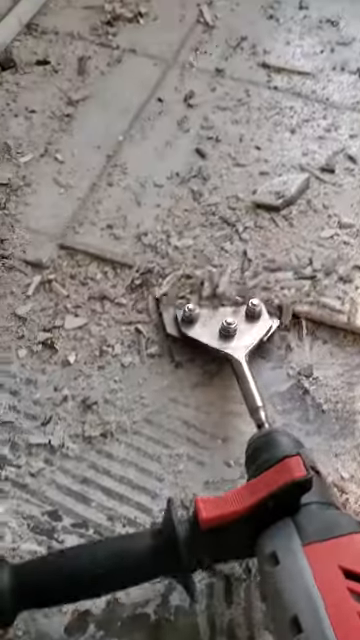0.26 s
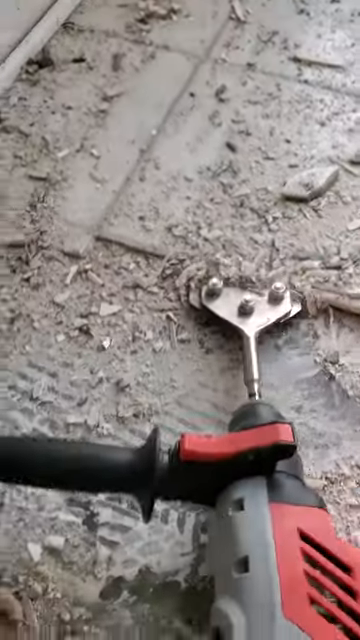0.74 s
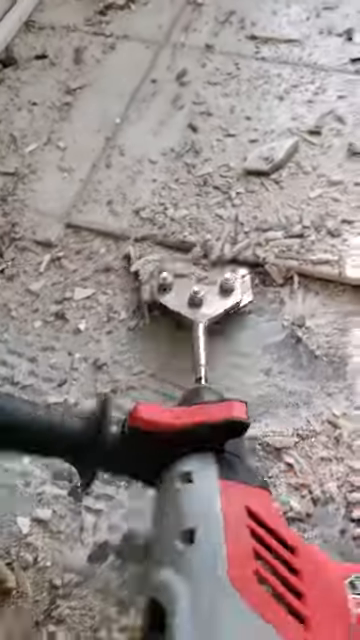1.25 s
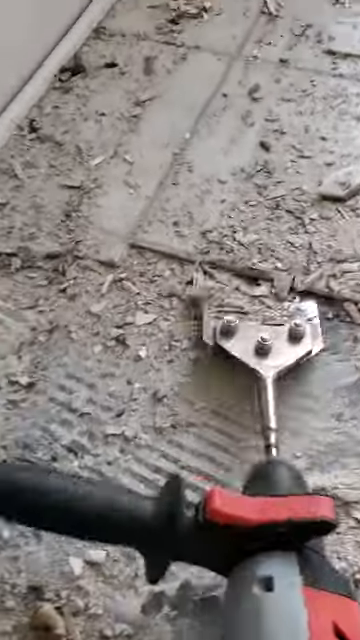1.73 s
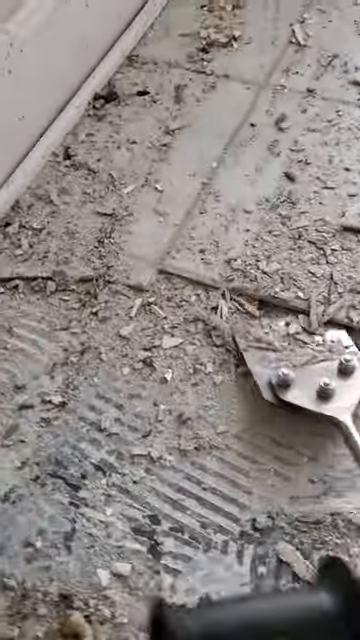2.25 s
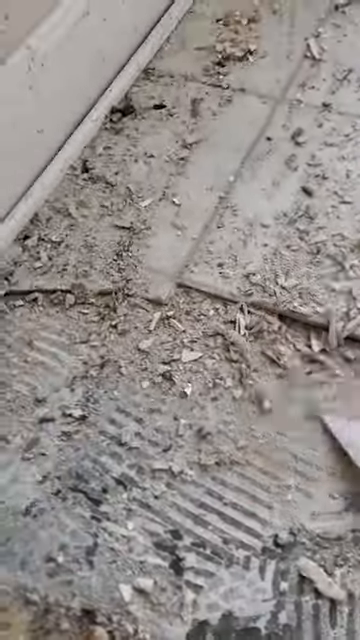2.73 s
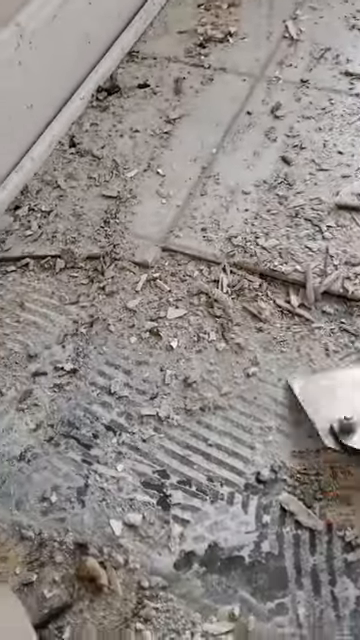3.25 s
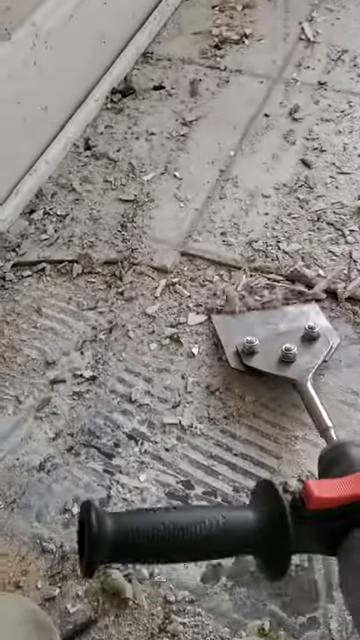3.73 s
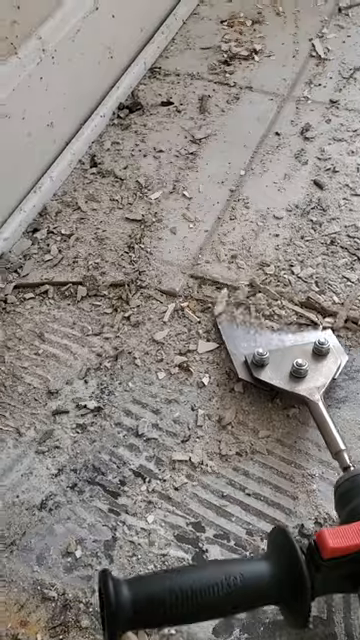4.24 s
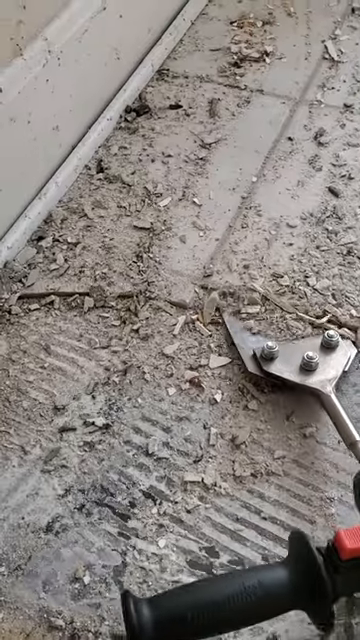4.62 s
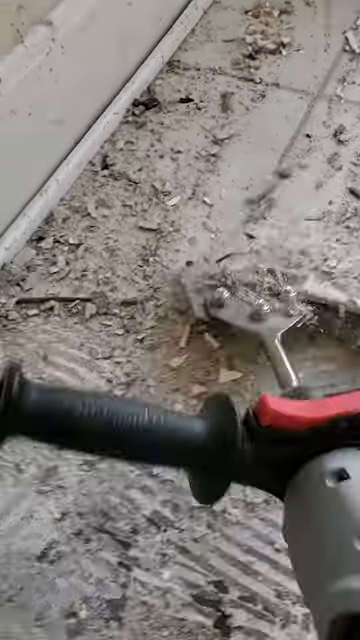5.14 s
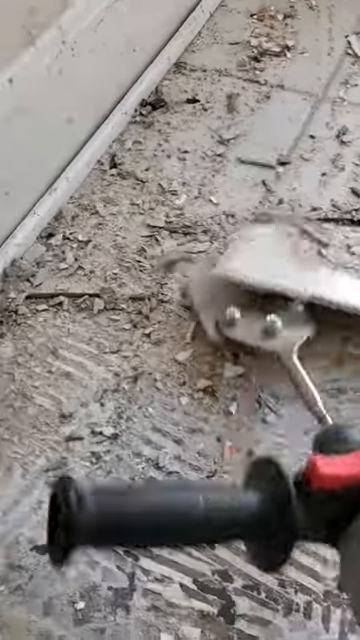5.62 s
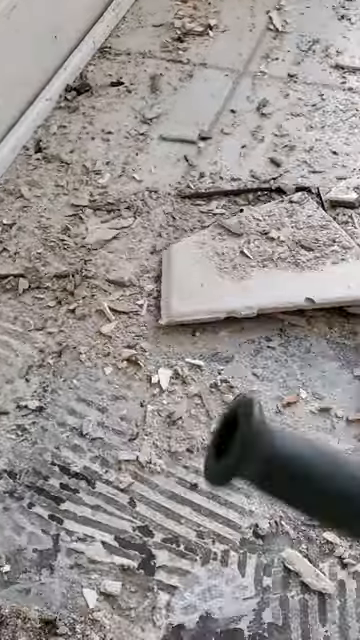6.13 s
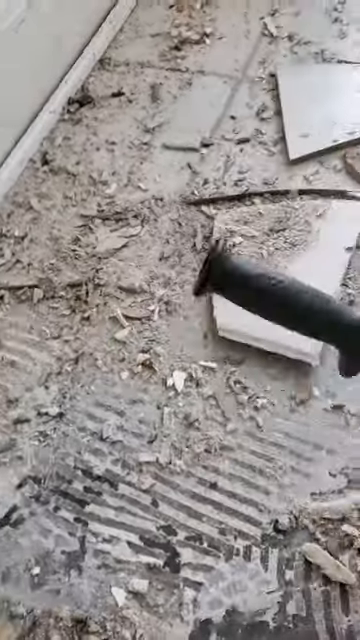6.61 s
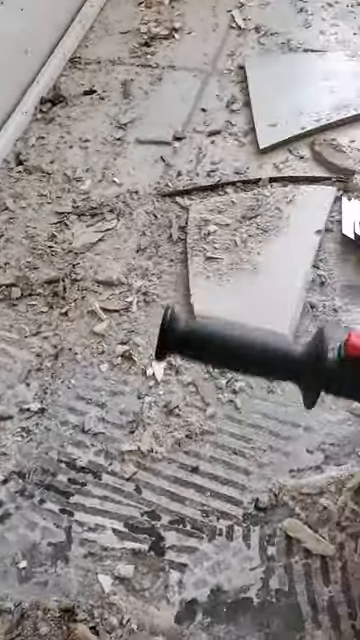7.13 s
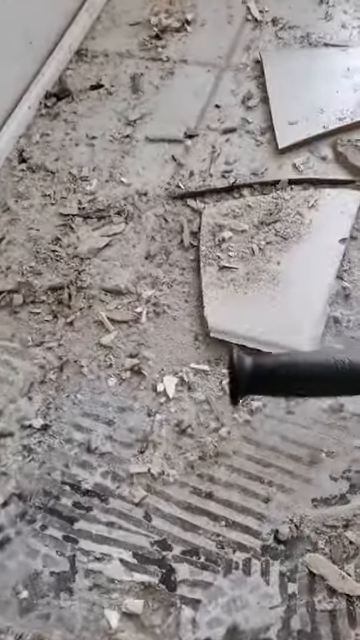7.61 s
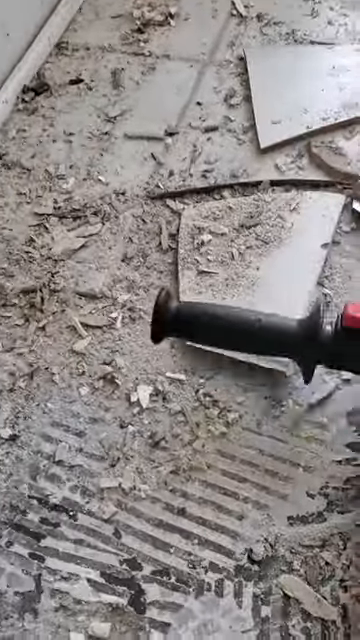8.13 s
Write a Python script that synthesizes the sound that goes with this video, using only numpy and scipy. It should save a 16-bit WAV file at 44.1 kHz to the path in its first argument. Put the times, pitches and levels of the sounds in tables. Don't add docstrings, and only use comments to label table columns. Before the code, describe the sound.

A rotary hammer with a wide steel scraper hammers floor tile in harsh rapid bursts, with motor coast-downs and gritty scraping between, in a bare room.

```python
import sys
import numpy as np
from scipy import signal
from scipy.fft import rfft, irfft, next_fast_len
from scipy.io import wavfile

SR = 44100
rng = np.random.default_rng(int(sys.argv[2]) if len(sys.argv) > 2 else 0)


def digitize_waveform(pressure):
    field = np.atleast_2d(pressure).T
    bounded = np.clip(field, -1, 1)
    quanta = np.round(bounded * 32767).astype(np.int16)
    wavfile.write(sys.argv[1], SR, quanta)


def elevation(decibels):
    levels = np.asarray(decibels, float)
    return 10 ** (levels / 20)


N = 369116
T = np.arange(N) / SR
SIZE = next_fast_len(N + 8192)
HZ = np.maximum(np.arange(SIZE // 2 + 1) * SR / SIZE, 1)

# (time [s], blows so far [count])
STRIKER = [
    [(.0131, 0), (.106, 7), (.1954, 14), (.315, 23), (.3922, 29), (.4482, 33), (.5843, 43), (.661, 48),
     (.7107, 51)],
    [(3.9224, 0), (3.9749, 2), (4.0316, 5), (4.1155, 10), (4.219, 17), (4.3245, 23), (4.3469, 25),
     (4.4663, 34), (4.554, 41), (4.6635, 49), (4.8208, 61), (4.9298, 69), (5.001, 74), (5.0782, 80),
     (5.2844, 96)],
    [(6.0777, 0), (6.1057, 1), (6.1385, 3), (6.2556, 11), (6.2977, 14), (6.4291, 24), (6.4633, 27),
     (6.5418, 33), (6.6096, 38), (6.7022, 44)],
    [(7.3487, 0), (7.461, 8), (7.6216, 20), (7.8829, 40), (8.0917, 55)],
]
# (frequency [Hz], density [dB per Hz])
GRIT = [(180, -51), (300, -12), (460, -47), (586, -3), (1340, -2), (1730, -1), (2170, -1.5), (3180, 5),
        (7480, -8), (9000, -8), (11700, -68), (19800, -120)]
# (frequency [Hz], density [dB per Hz])
DUST = [(4120, -19), (7000, 2), (7640, 1), (8060, -4.5), (9630, -5.5), (11200, 0.5), (12700, -5),
        (14200, 2.5), (15600, 3)]
# (frequency [Hz], level [dB], t60 [s])
SHARDS = [(639, -7.5, 0.14), (1116, -6.5, 0.1), (1623, 1, 0.043), (1800, -2, 0.09), (3140, -5, 0.058),
          (5000, -0.5, 0.049)]
# (frequency [Hz], likeness [0..1])
LIKENESS = [(60, 1), (200, 0.81), (600, 0.87), (1600, 0.087), (5000, 0.027), (15000, 0.5)]


def in_time(rows):
    s, *columns = np.transpose(rows)
    return [np.interp(T, s, c) for c in columns]


def at_hz(points, hz):
    table_hz, values = np.transpose(points)
    return np.interp(np.log(hz), np.log(table_hz), values)


def drift(rate):
    knot_rate = 400
    knots = rng.standard_normal(int(N / SR * knot_rate))
    r = np.exp(-2 * np.pi * rate / knot_rate)
    slow = signal.lfilter([1], [1, -2 * r, r * r], knots)
    return np.interp(T * knot_rate, np.arange(len(slow)), slow / slow.std())


def coloured(envelope, spectrum, likeness, lag, peaks=(), on=slice(None)):
    grid = 16384
    hz = np.maximum(np.arange(grid // 2 + 1) * SR / grid, 1)
    gain = elevation(at_hz(spectrum, hz))
    for centre, width, db in peaks:
        gain = gain * (1 + elevation(db) / (1 + (2 * (hz - centre) / width) ** 2))

    cepstrum = irfft(np.log(gain + 1e-7))
    cepstrum[1:grid // 2] *= 2
    cepstrum[grid // 2 + 1:] = 0
    body = rfft(irfft(np.exp(rfft(cepstrum)))[:grid // 2], SIZE)

    right, own = rfft(envelope * rng.standard_normal((2, N)), SIZE) * body
    alike = np.clip(at_hz(likeness, HZ), 0, .99)
    delayed = right * np.exp(-2j * np.pi * HZ * lag / SR)
    left = alike * delayed + np.sqrt(1 - alike ** 2) * own
    out = irfft([left, right], SIZE)[:, :N]
    return out / np.sqrt(np.mean(out.mean(axis=0)[on] ** 2))


def panned(x, pan_db):
    return x * elevation(np.outer([.5, -.5], pan_db))


def bursts(times, sizes, rise_s, fall_s):
    clicks = np.bincount((np.clip(times, 0, T[-1]) * SR).astype(int), sizes, N) + 1e-12
    rise, fall = np.exp(-1 / (np.maximum([rise_s, fall_s], 2e-5) * SR))
    return signal.lfilter([1 - rise], np.convolve([1, -rise], [1, -fall]), clicks)


def rings(at, modes, scatter_db, detune):
    length = 1100
    out, tail = np.zeros((2, N + length)), np.arange(length) / SR
    chance = rng.standard_normal((len(at), 3, modes.shape[1], 1))
    for s, mode, db, (off, size, turn) in zip(at, modes, scatter_db, chance):
        hz, mode_db, t60 = mode[:, :1], mode[:, 1:2], mode[:, 2:]
        phase = 2 * np.pi * hz * (1 + detune * off) * tail
        level = elevation(mode_db + db * size - 60 * tail / t60)
        start = int(s * SR)
        for side in (0, 1):
            out[side, start:start + length] += np.sum(level * np.sin(phase + side * turn), axis=0)
    return out[:, :N]


def swells(start, held, level_db, rise, fall):
    t = T[::32, None]
    before, after = np.maximum(start - t, 0), np.maximum(t - start - held, 0)
    db = level_db - rise * before - fall * after
    return np.interp(T, t[:, 0], np.maximum(db.max(axis=1), -120))


def shove_levels():
    # (start [s], held [s], steel crack [dB], tile break [dB], slab thump [dB])
    shoves = [(0.027, .065, -22, -24, -36.5), (.17, 0.12, -21, -27.5, -35.5), (.34, 0.12, -22, -22, -36.5),
              (0.502, 0.11, -20, -20, -36.5), (3.99, 0.14, -21, -25, -36),
              (4.19, 0.065, -24.5, -23.5, -35.5), (4.377, 0.059, -20.5, -21.5, -36.5),
              (4.512, 0.12, -22, -21, -35), (4.69, 0.072, -25, -21.5, -41), (4.8, 0.24, -26.5, -25, -35.5),
              (5.052, 0.027, -22, -21, -32), (5.193, 0.066, -23.5, -23.5, -39.5),
              (6.119, 0.016, -23, -23, -37.5), (6.226, 0.047, -23, -21.5, -42),
              (6.398, .05, -21.5, -28.5, -53), (6.459, 0.35, -20, -24, -37),
              (7.35, 0.13, -26.5, -22.5, -42.5), (7.46, 0.27, -27, -24, -48), (7.72, 0.13, -25, -22.5, -36),
              (7.831, 0.13, -20, -24, -40.5), (8.029, 0.039, -24.5, -20, -32.5)]
    slopes = [(210, 186), (380, 250), (690, 1300)]   # (rise, fall) [dB per s] of steel, tile, slab
    s, held, *levels_db = np.transpose(shoves)
    on = sum((T > r[0][0] - .015) & (T < r[-1][0] + .03) for r in STRIKER) > 0
    return [np.where(on, np.maximum(swells(s, held, db, rise, fall), -90), -120)
            for db, (rise, fall) in zip(levels_db, slopes)]


def background():
    # (time [s], level [dB])
    gain_curve = [
        (0, -56),
        (.75, -58),
        (2.0, -51),
        (2.6, -35.5),
        (3.87, -37.5),
        (4.03, -55),
        (5.0, -68),
        (5.8, -68),
        (8.37, -61),
    ]
    # (frequency [Hz], density [dB per Hz])
    hiss_colour = [(88, -6.5), (150, -7.5), (326, -13.5), (738, -9), (1370, -11), (7030, -20), (9050, -42),
                   (15600, -19)]
    rumble_colour = [(20, -24), (55, 5.0), (100, -7.0), (200, -29.0)]
    hum_db, = in_time(gain_curve)
    rumble_db = -57.5 + .94 * (hum_db + 49)
    hum_hz = 119.3 + 2.15 * drift(12.3)
    hum = elevation(hum_db - 5.5 + 3.5 * drift(5.4)) * np.sin(2 * np.pi * np.cumsum(hum_hz) / SR)
    rumble = elevation(rumble_db + elevation(-38) * drift(7.8)) * coloured(1, rumble_colour, LIKENESS, 0)
    return hum + rumble + elevation(-54.5) * coloured(1, hiss_colour, LIKENESS, 6.8)


def motor():
    # (pulled [s], held [s], motor [dB], coasting [dB per s])
    trigger = [
        (0, 0.47, -26, 31.5),
        (4.1, 1.596, -31.5, 24),
        (6.3, 0.086, -28.5, 15.5),
        (7.4, 0.81, -31, 17),
    ]
    # (from [s], for [s], speed at first [turns per s], change [turns per s per s])
    crank = [
        (.72, .9, 74, -27.5),
        (5.3, .75, 84, -33),
        (6.74, .58, 72, -24),
        (8.09, .28, 75, 43),
    ]
    # (multiple of crank speed, level [dB])
    orders = [(1, -1.5), (2, -5.5), (4, -3.5), (5, -4.5), (7, -3), (8, 5.5), (9, 5.5), (11, 1), (12, 7.5),
              (14, 8.5), (35.0, 0), (59.5, 7)]
    # (frequency [Hz], density [dB per Hz])
    whirr = [(35, -83), (60, -35), (156, -8.5), (192, -23), (272, -6), (487, -10.5), (600, -2.5),
             (1420, 1.5), (1630, 1), (3690, 2), (7580, 1), (8720, -5.5), (15600, -7.5)]
    # (frequency [Hz], width [Hz], level [dB])
    housing = [(727, 31, 1.5), (1434, 11, 3), (2530, 25, -7), (3480, 1700, -6), (7540, 83, 2.5)]
    spin_up, stall_after_s, stall_fall = 37.5, 1.35, 85

    s, held, pulled_db, coast = np.transpose(trigger)
    level_db = swells(s, held, pulled_db, spin_up, coast)
    since = T - held[0]
    level_db += 7.5 * (T < s[1]) * np.clip(since, 0, stall_after_s) ** 2
    stalled = (since > stall_after_s) & (T < s[1])
    restart_db = swells(s[1], 0, pulled_db[1], 2.7 * spin_up, 99)
    level_db = np.maximum(level_db - stall_fall * stalled * (since - stall_after_s), restart_db)

    turns = sum(((T > a) & (T < a + span)) * (first + change * (T - a))
                for a, span, first, change in crank)
    free = turns > 0
    crank_db = level_db - 28.5 + .73 * (turns - 70)
    phase = 2 * np.pi * np.cumsum(turns * (1 + .009 * drift(6))) / SR
    grain = elevation(1.3 * drift(70) + .4 * drift(8) + 1.8 * np.cos(phase) * free)
    duck_db = -.6 * np.maximum(shove_levels()[0] + 35, 0)
    out = elevation(level_db + 4.0 + duck_db) * coloured(grain, whirr, LIKENESS, 6.8, housing)
    for k, db in orders:
        order_db = crank_db[free] + db + 4.1 * drift(2.6)[free]
        out[:, free] += elevation(order_db) * np.sin(k * phase[free] + k * k)
    return panned(out, -3.5)


def scrape():
    # (start [s], held [s], level [dB], dust against it [dB], fall [dB per s])
    strokes = [(2.14, 0.14, -45.5, -11, 297), (2.343, 0.011, -41.5, 5, 302), (2.45, 0.067, -47, 6, 102),
               (2.6, .08, -43, -7, 100), (2.635, 0.0085, -35.5, 6, 300), (2.708, 0.06, -22.5, 4, 95),
               (2.847, 0.053, -30.5, 13.5, 111), (3.074, 0.068, -30, 6, 33), (3.15, 0.083, -30, 9.5, 74),
               (3.33, 0.017, -32.5, 10.5, 140), (3.58, 0.1, -41, 10.5, 146), (3.899, 0.016, -27, -13, 1498)]
    # (frequency [Hz], width [Hz], level [dB])
    blade_peaks = [(613, 280, -28.5), (1585, 170, -29), (1750, 70, -17), (4570, 270, -10), (6500, 260, 1),
                   (8640, 87, -20)]
    # (time [s], pitch factor, level [dB])
    heap = [
        (2.3, 0.96, -0.5),
        (2.72, 1.0, -3.5),
        (2.95, 0.99, -0.5),
        (3.05, 1, -0.5),
        (3.2, 0.98, -10),
        (3.35, .85, 1.5),
        (3.5, 0.9, 3),
        (3.9, 0.92, -13.5),
    ]
    rumble_colour = [(80, -9), (160, -5.5), (300, -7.5), (580, 2.5), (900, -13)]
    rise = 506
    s, held, db, dust_db, fall = np.transpose(strokes)
    level_db = swells(s, held, db, rise, fall)
    treble_db = swells(s, held, db + dust_db, rise, fall) - level_db
    drag_db = swells(2.52, 1.4, -41.5, 340, 900)
    rumble_db = drag_db + .07 * (level_db - 4) - level_db + 10.5

    caught = np.flatnonzero(rng.random(N) < 1400 * elevation(2.0 * drift(40)) / SR) / SR
    grain_db = 3.6 * np.minimum(rng.exponential(1, len(caught)), 4)
    grains = bursts(caught, elevation(grain_db), .0001, 0.0053) + 1.8
    blade = coloured(grains, GRIT, LIKENESS, 7.9, blade_peaks)

    tumbles = rng.uniform(2.3, 3.9, 280)
    pitch, heap_db = in_time(heap)
    pieces = np.tile(SHARDS, (len(tumbles), 1, 1))
    pieces[:, :, 0] *= pitch[(tumbles * SR).astype(int), None]
    shards = elevation(heap_db) * rings(tumbles, pieces, 0 * tumbles + 4, .07)

    dust_grains = grains ** 1.4 * elevation(0.37 * drift(29))
    dust = elevation(treble_db) * coloured(dust_grains, DUST, LIKENESS, 3.8)
    rumble = elevation(rumble_db - 5.5) * coloured(elevation(6.8 * drift(27)), rumble_colour, LIKENESS, 2.2)
    return elevation(level_db + 0.5) * panned(blade + shards + dust + rumble, -3.5)


def knocks():
    # (time [s], peak [dB], low [dB], treble [dB])
    contacts = [(1.648, -23.5, -29.5, -53), (1.696, -25.5, -47, -24), (1.893, -45, -60, -33),
                (2.0386, -50, -60, -37), (2.0675, -48, -60, -35), (2.082, -43, -60, -30),
                (2.13, -81, -32.5, -33), (2.1463, -18.5, -24.5, -42), (2.2078, -30, -29, -43),
                (2.336, -36, -37, -21), (2.4154, -18.5, -42, -43), (2.432, -23, -60, -22),
                (2.4443, -5.5, -51, -3.5), (2.519, -45, -21.5, -45), (2.5845, -14, -17, -34),
                (2.6228, -16, -21, -22), (2.687, -8, -35, -12), (2.7055, -12, -26, -21),
                (2.74, -3, -37, -26), (2.763, -7, -40, -7), (3.585, -18, -58, -10), (3.6104, -25, -49, -8),
                (3.616, -29, -59, -15), (3.663, -35, -34, -6), (3.669, -35, -62, -20),
                (3.6775, -35, -60, -20), (3.684, -35, -60, -18), (3.699, -30, -60, -11),
                (3.7152, -16, -60, -13), (3.712, -19.5, -36, -9), (3.7379, -21, -50, -22),
                (3.7826, -32, -59, -16), (3.8295, -23, -49, -14), (3.855, -22, -39, -52),
                (3.922, -35, -50, -11), (3.9493, -20, -28, -12), (3.973, -13.5, -24, -14),
                (4.2258, -12, -40, -16), (4.9867, -10, -35, -40), (5.6795, -16, -49, -30),
                (6.2263, -5, -25, -24), (6.388, -8, -44, -30)]
    thud = [(100, -0.5), (200, 0.5), (700, -7.0), (1500, -21.0)]
    s, peak_db, low_db, treble_db = np.transpose(contacts)
    modes = np.tile(SHARDS, (len(s), 1, 1))
    modes[:, :, 1] += peak_db[:, None]
    out = elevation(-24) * rings(s, modes, 0 * s + 4, .03)
    layers = [(peak_db - 8.5, .0015, GRIT), (treble_db - 6.5, .002, DUST), (low_db - 5.0, .006, thud)]
    for db, fall_s, colour in layers:
        envelope = bursts(s, elevation(db), .00003, fall_s)
        out = out + coloured(envelope, colour, LIKENESS, 4.1) * np.sqrt(np.mean(envelope ** 2))
    return panned(out, -4.0)


def snaps():
    # (time [s], peak [dB], pitch [Hz], t60 [s])
    clicks = [(0.9056, -24, 2610, 0.018), (1.0378, -32, 2053, .02), (1.0832, -34.5, 2840, 0.022),
              (1.164, -33, 3270, .02), (1.379, -34, 1649, 0.028), (1.5645, -39, 1800, 0.042),
              (1.696, -39, 1740, .03), (2.345, -25, 1620, .08), (1.8575, -35.5, 5690, 0.024),
              (2.7213, -17, 1700, 0.044), (2.7392, -13, 1680, 0.071), (2.868, -18, 4900, 0.018),
              (2.909, -21, 1700, 0.039), (3.09, -27, 1800, 0.034), (3.215, -21.5, 1600, 0.064),
              (3.3285, -24, 1230, 0.068), (3.424, -25, 1190, .05), (3.5784, -29, 3920, 0.018),
              (3.7385, -3, 12650, 0.015), (.026, -13.5, 2620, 0.025), (.078, -20, 2310, 0.023),
              (.381, -15.5, 2290, .03), (4.9853, -11, 2260, 0.026), (4.9865, -16, 1010, 0.032),
              (5.003, -25.5, 1180, 0.058), (5.0795, -18, 3930, 0.042), (5.8414, -26, 3640, .02),
              (5.8945, -22, 3420, 0.018), (5.9145, -26, 2170, 0.022), (5.994, -23.5, 3700, 0.023),
              (6.0106, -26.5, 2130, 0.04), (5.683, -28, 1330, 0.099), (6.2406, -17.5, 1920, 0.059)]
    ratios = [0.801, .93, 1.0, 1.09, 1.25]
    s, db, hz, t60 = np.array(clicks).T[:, :, None]
    spread = np.minimum(2620 / hz, 1)
    modes = np.stack(np.broadcast_arrays(hz * ratios ** spread, db - 6, t60), axis=2)
    return panned(rings(s[:, 0], modes, 0 * s[:, 0] + 3, 0.037), -2.9)


def blow_modes(at, odd_db):
    # (frequency [Hz], level [dB], t60 [s])
    chisel = [(654, -12.5, 0.11), (738, -10.5, 0.11), (1242, -12, 0.11), (2140, -12.5, 0.087),
              (2740, -7, 0.066), (3140, -6.5, 0.087), (3580, -7, 0.04)]
    # (time [s], ring [Hz], ring share [dB], boom of the blade [dB])
    patch_curve = [(.3, 1850, -32, -7), (.4, 1910, -31, 11), (.46, 1950, -18, 4), (.65, 1930, -6.5, 8.5),
                   (4.0, 1750, -33.5, -6), (4.33, 1930, -3.5, -14), (4.42, 1750, -22, -23),
                   (4.48, 1640, 7, -23), (4.53, 1810, -18, -29), (4.9, 2130, -8, -4), (5.3, 1860, -18, 3),
                   (6.2, 1992, -35, 2.5), (6.65, 1460, -6, 6.5), (7.36, 1680, -13, 6), (7.44, 1580, -6, 3),
                   (7.54, 1670, -4.5, -13), (7.62, 1830, -6, -10), (7.72, 2020, -6.5, -7),
                   (7.8, 1990, -10.5, -3), (7.93, 1880, -16, 6), (8.0, 1850, -3.5, 10),
                   (8.1, 1670, -10.5, 3)]
    # (time [s], frequency [Hz], level [dB])
    plate_curve = [(0, 2800, -16), (.15, 2870, 4), (.36, 2800, -1), (.39, 3800, 5), (.45, 3900, -3),
                   (.56, 3700, 4), (.7, 3760, -1), (4.0, 3530, -14), (5.3, 3950, -20), (6.7, 3840, -15),
                   (7.36, 3950, -7), (7.45, 3770, 4), (7.54, 4100, -4), (7.6, 3980, -14.5),
                   (7.72, 4270, -15), (7.79, 3970, 5.5), (7.87, 4200, -6), (8.1, 3900, -25)]
    boom_shares = [1, 0.77, 0.2, 0.91, 0.15, 0.38, -0.2]
    i = (at * SR).astype(int)
    patch_hz, patch_db, boom_db = [c[i] for c in in_time(patch_curve)]
    plate_hz, plate_db = [c[i] for c in in_time(plate_curve)]
    patch = np.transpose([patch_hz, patch_db + 10.5, 0 * at + .024])[:, None]
    plate = np.transpose([plate_hz, plate_db, 0 * at + .034])[:, None]
    blade = np.tile(chisel, (len(at), 1, 1)) - [0, 4.5, 0]
    blade[:, :, 1] += np.outer(boom_db, boom_shares)
    modes = np.concatenate([blade, patch, patch * [1.14, 1, 1] - [0, 3, 0], plate], axis=1)
    modes[:, :, 1] += odd_db[:, None]
    return modes


def hammer():
    # (time [s], steel [dB], tile [dB])
    odd_blows = [(0.014, -25, -4), (0.08, 0, -5), (0.119, -17, -17), (0.132, -15, -16), (0.145, -9, 2),
                 (0.158, -15, 9), (0.198, 1, 7), (0.211, 2, 2), (0.316, -18, 7), (0.329, -15, 0),
                 (0.46, 4, 1), (0.473, -6, 5), (0.487, 1, 4), (0.662, 9, 6), (0.678, 2, 7), (0.695, 5, 5),
                 (0.711, -5, 16.5), (3.922, -3, -7), (3.975, 6, -15), (4.013, -11, -8), (4.16, -15, -20),
                 (4.22, 9, -1), (4.271, -3, -22), (4.289, -5, -13), (4.323, -12, 7), (4.388, -11, 2.5),
                 (4.609, -2, -3), (4.649, 0, -14), (4.77, 2, -6), (4.783, 3, -7), (4.797, 7, 2.5),
                 (4.81, 11, 1), (4.878, 8, -2), (4.904, 9, 2.5), (4.931, -11, 4), (4.972, 8, 2),
                 (4.985, -4, 4.5), (4.999, -2, -6), (5.012, -15, 3), (5.025, -15, -14), (5.156, -14, 4),
                 (5.182, -9, 2), (5.22, 4, 1.5), (5.272, -1, -3), (6.153, -7, -1), (6.168, -15, 5),
                 (6.182, -20, -11), (6.282, -5, -6), (6.295, -9, -16), (6.347, -15, -2), (6.36, -23, -10),
                 (6.464, -17, -7), (7.378, 10.5, -4), (7.831, -12, -3), (7.939, -3, -3), (7.981, -1, 8),
                 (7.995, -9, 7), (8.064, 5.5, -3), (8.078, 1, -12), (8.092, -6, -2.5)]
    # (frequency [Hz], density [dB per Hz])
    crack_colour = [(3000, -58), (5000, -7.5), (7300, 0.5), (8400, -8), (10300, 3.5), (12000, 16),
                    (13700, 7), (15200, 12.5), (16200, -0.5)]
    # (frequency [Hz], density [dB per Hz])
    break_colour = [(180, -35), (300, -28), (523, -1.5), (735, -5.5), (848, 1), (1240, -1), (1960, 2),
                    (2330, 1.5), (3780, 1), (9000, 0.5), (11700, -4), (19800, -120)]
    # (frequency [Hz], density [dB per Hz])
    thump_colour = [(15, 9), (25, -16), (59, 7), (221, -3.5), (267, -3), (361, -7.5), (404, -5.5),
                    (500, -8), (650, -13), (1100, -120)]
    # (frequency [Hz], likeness [0..1])
    likeness = [(60, 0), (250, .05), (600, .55), (1600, .55), (5000, .45), (15000, .3)]

    at = np.concatenate([np.interp(np.arange(r[-1][1] + 1), *np.transpose(r)[::-1]) for r in STRIKER])
    crack_db, break_db, thump_db = shove_levels()
    on = crack_db > -100
    uneven = np.where((at > 7.4) & (at < 7.8), .35, 1)
    luck = rng.standard_normal((len(at), 7)) * uneven[:, None]
    odd_db = np.zeros((len(at), 2))
    for s, *db in odd_blows:
        odd_db[np.abs(at - s).argmin()] = db
    modes = blow_modes(at, odd_db[:, 1])

    at = at - .0004 + .0004 * luck[:, 0]
    strike = at - .0011 + .0005 * luck[:, 1]
    rebound = at + .002 + .0006 * luck[:, 2]
    times = np.concatenate([at, strike, rebound])
    edge_db, strike_db, rebound_db = 1.3 * luck[:, 3], 3 * luck[:, 4], -10 + 3 * luck[:, 5]
    steel_db = np.concatenate([edge_db, strike_db - 9, rebound_db])
    tile_db = np.concatenate([edge_db, strike_db - 12, rebound_db + 3.5])
    sizes = elevation(steel_db + np.tile(odd_db[:, 0], 3))
    bites = elevation(tile_db + np.tile(odd_db[:, 1], 3))

    rattle = elevation(-27.5 + 6.4 * drift(90))
    singing = elevation(-23) * bursts(times, sizes, .00004, .0078)
    steel = bursts(times, sizes, .00008, 0.0006) + singing + rattle
    crack = coloured(steel, crack_colour, likeness, -1, on=on)
    crumble = bursts(times, bites, .0001, .0009) + 0.25 * rattle
    tile = elevation(-4) * coloured(crumble, break_colour, likeness, -3, on=on)
    tile = tile + rings(at, modes, 3 * uneven, .022)
    slab = bursts(at, elevation(1.93 * luck[:, 6]), 0.00072, 0.0014)
    thump = coloured(slab, thump_colour, likeness, 0, on=on)
    return panned(elevation(crack_db) * crack, -.5) + panned(elevation(break_db) * tile, -2) + elevation(thump_db) * thump


def room(x):
    t60_s, level_db = .45, -16
    t = np.arange(SR // 2) / SR
    tail = rng.standard_normal((2, len(t))) * elevation(-60 * t / t60_s) * (t > .004)
    tail = signal.lfilter([1], [1, -.5], tail)
    tail = tail / np.sqrt(np.sum(tail ** 2) / 2)
    return elevation(level_db) * signal.fftconvolve(x, tail, axes=1)[:, :N]


def scene():
    struck = hammer() + scrape() + knocks() + snaps()
    return struck + room(struck) + motor() + background()


def roll_off(x):
    return signal.sosfilt(signal.butter(12, 16970, fs=SR, output="sos"), x)


def record(dry):
    low_cut = signal.butter(2, 44, "high", fs=SR, output="sos")
    top_cut = signal.cheby2(24, 60, 16250, fs=SR, output="sos")
    x = signal.sosfilt(low_cut, dry)
    x = .8 * np.tanh(x / .8)
    return roll_off(signal.sosfilt(top_cut, x))


dry = scene()
out = record(dry)
digitize_waveform(out)
```